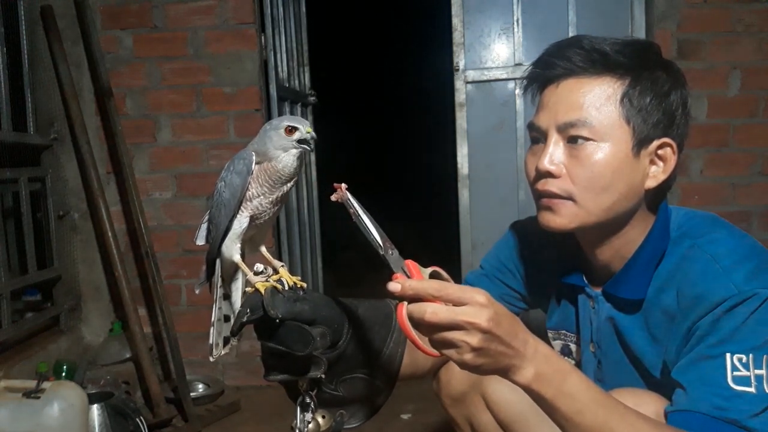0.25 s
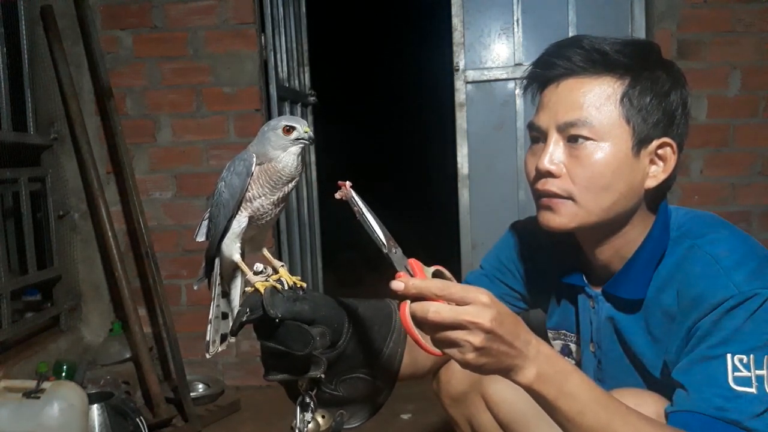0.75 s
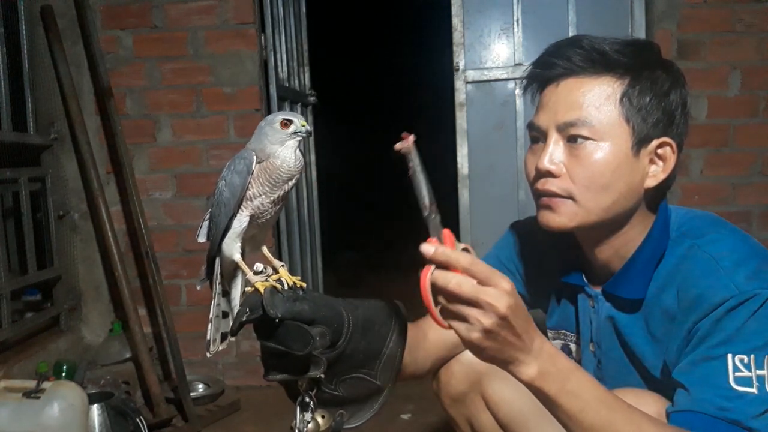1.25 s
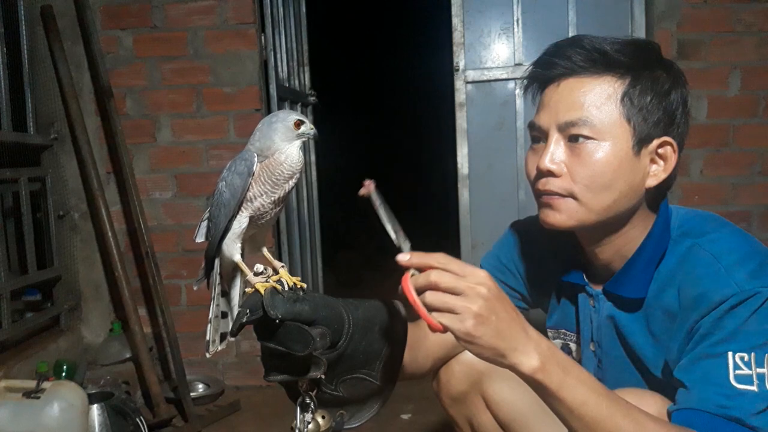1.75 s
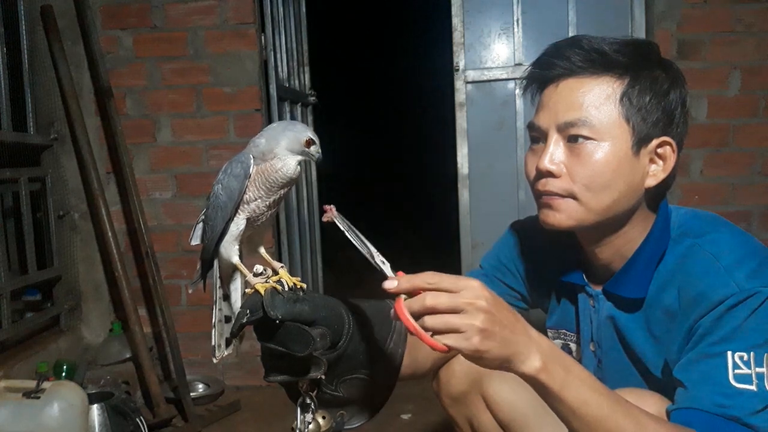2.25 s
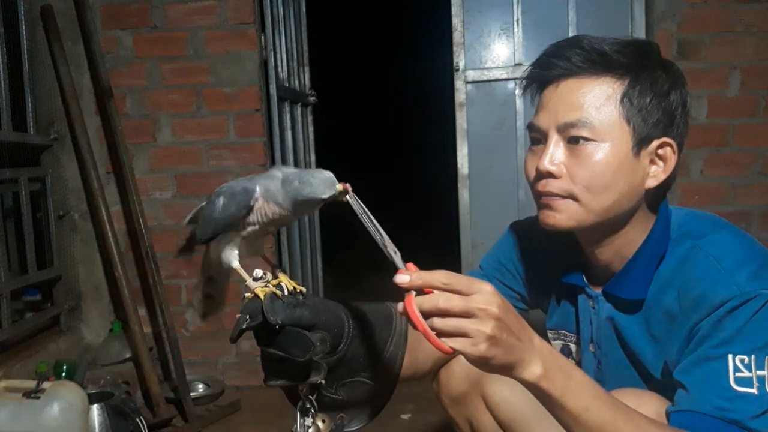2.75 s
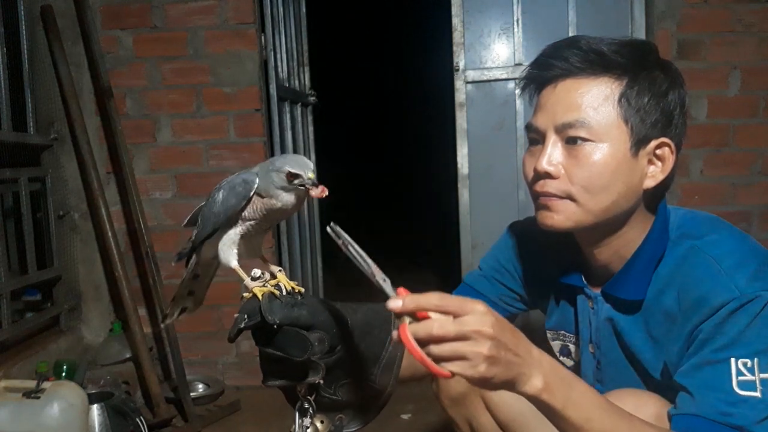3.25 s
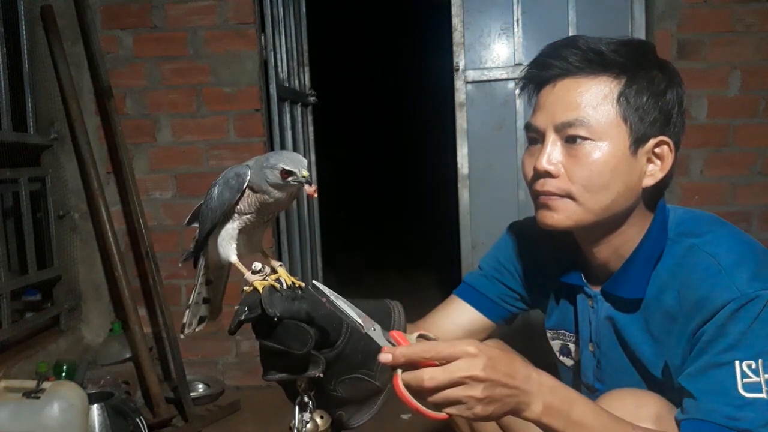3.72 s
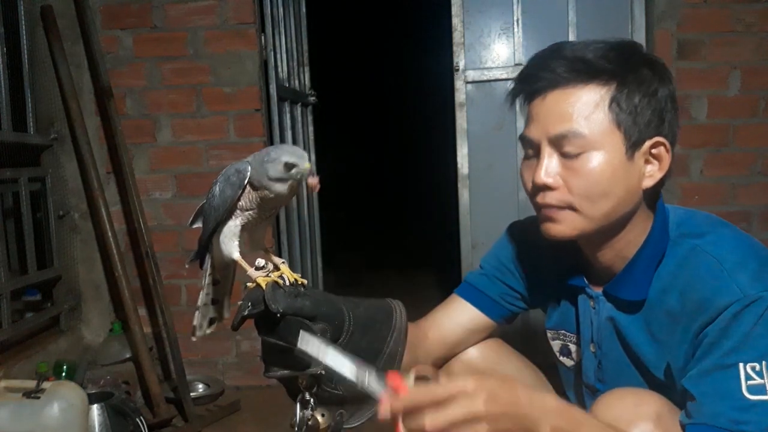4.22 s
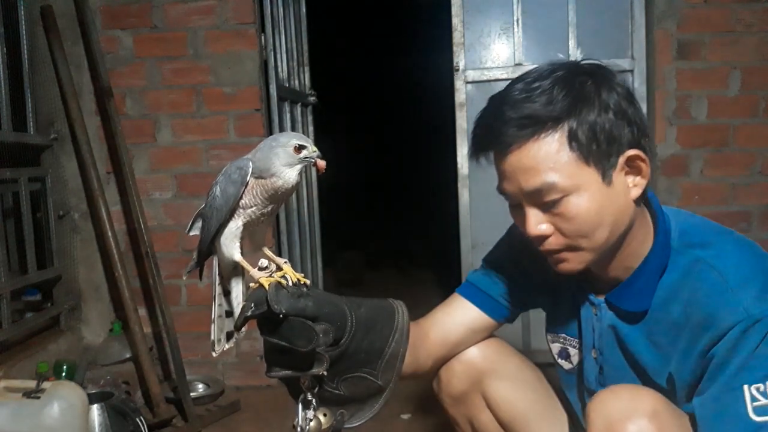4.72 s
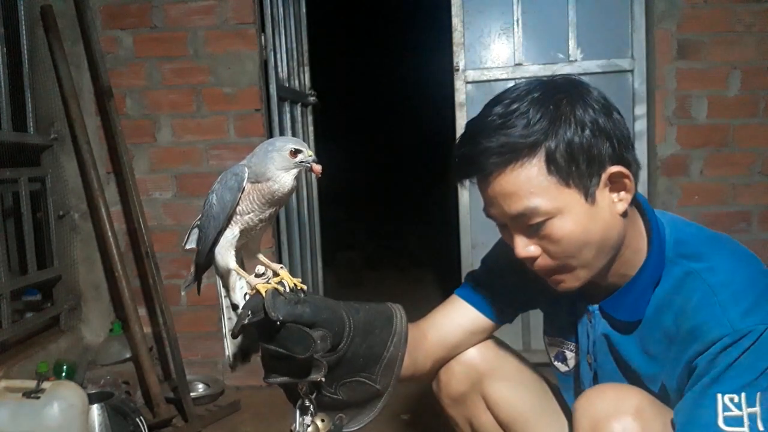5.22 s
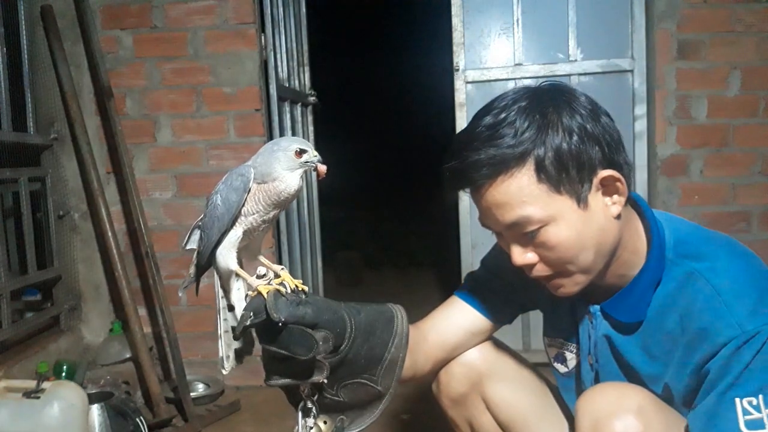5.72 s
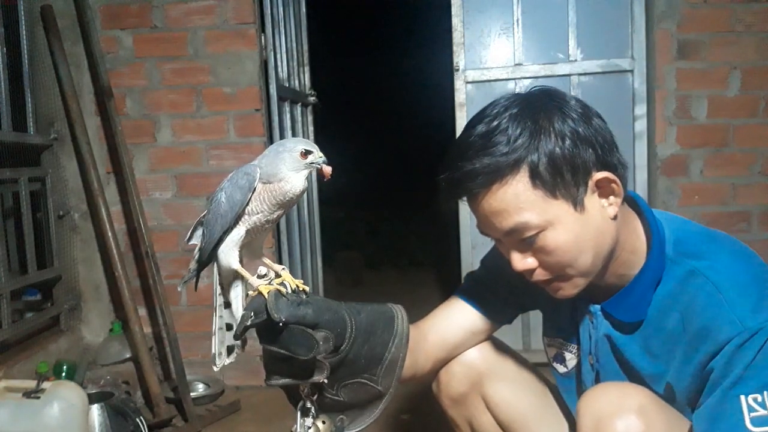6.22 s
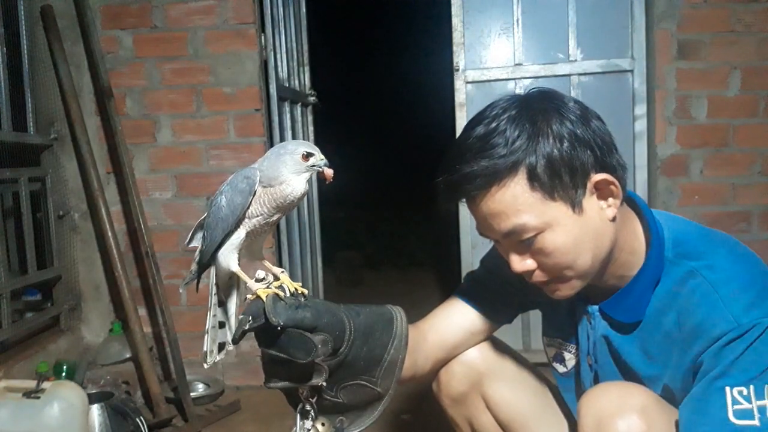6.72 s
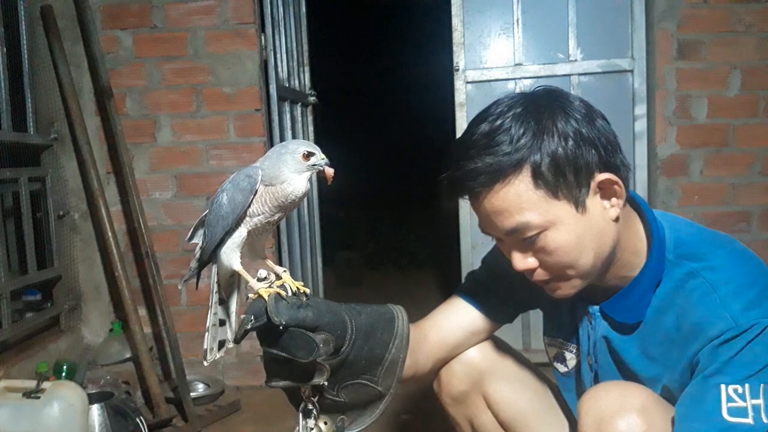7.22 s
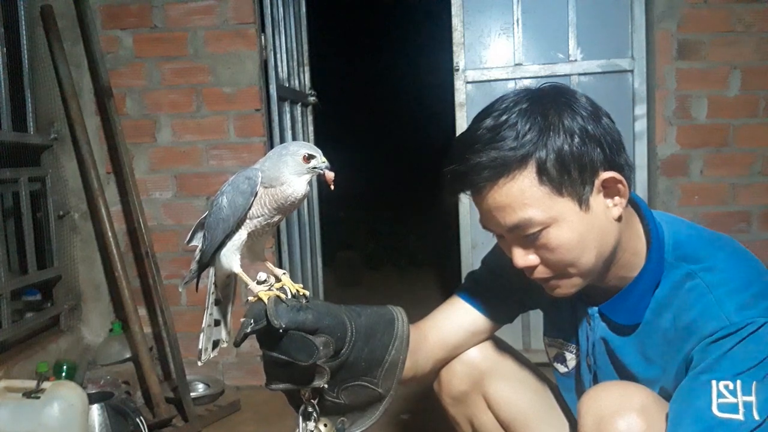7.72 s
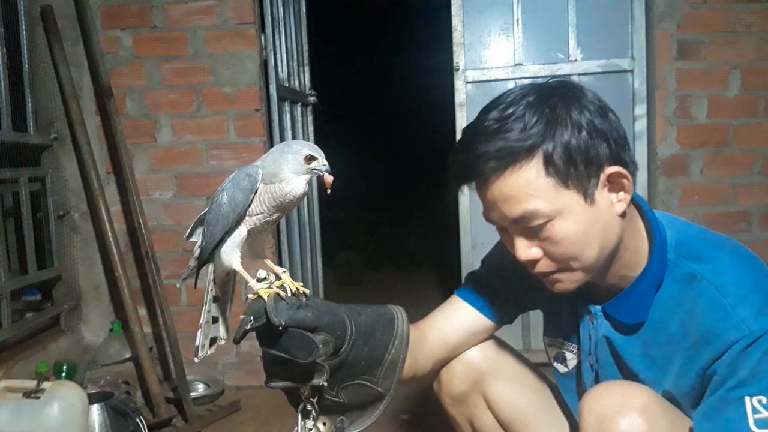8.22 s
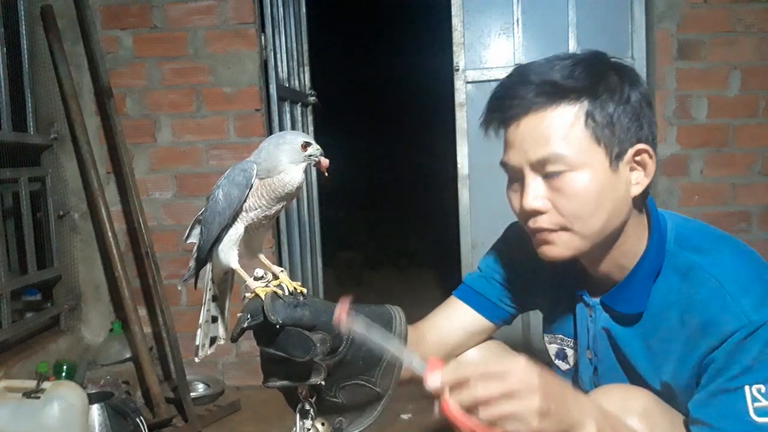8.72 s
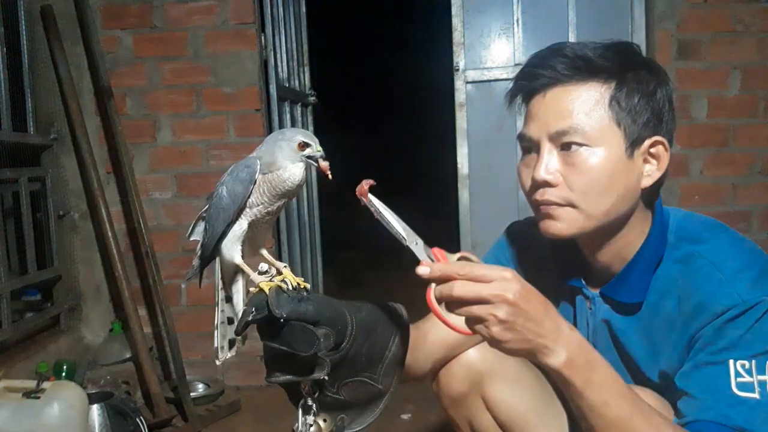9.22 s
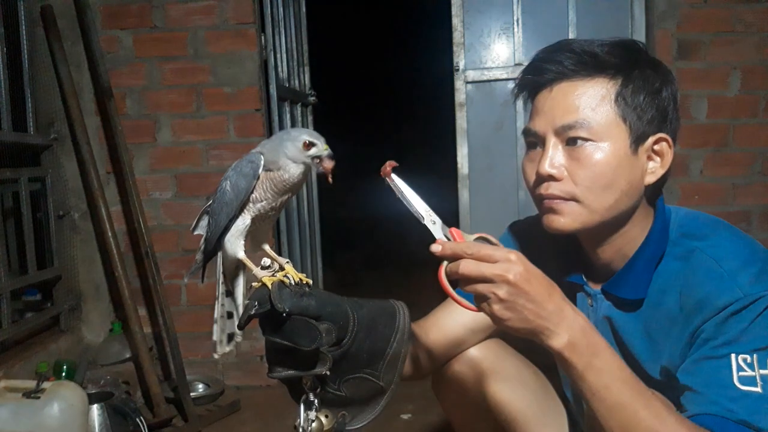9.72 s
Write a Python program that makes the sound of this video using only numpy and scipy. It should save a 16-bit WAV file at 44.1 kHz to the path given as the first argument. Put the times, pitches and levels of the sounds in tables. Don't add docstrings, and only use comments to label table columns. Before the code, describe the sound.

Night beside a brick shed: crowds of insects chirr continuously in the distance over faint rumble and hiss. Close by, a hawk's feathers and a leather glove rustle, with dry beak and talon ticks. A small chain jingles around 3.5 seconds, a dry scissor-like joint squeaks twice just after 4, then a tool knocks a board into ringing between 5.3 and 7.3. The chain jingles again after 8. Near microphone, short echo from bare walls.

```python
import sys
import numpy as np
from scipy import signal
from scipy.fft import rfft, irfft
from scipy.io import wavfile

SR = 44100
rng = np.random.default_rng(int(sys.argv[2]) if len(sys.argv) > 2 else 0)


def voltage_ratio(level):
    return 10 ** (np.asarray(level, float) / 20)


def wav_out(sig):
    wavfile.write(sys.argv[1], SR, np.round(np.clip(np.atleast_2d(sig).T, -1, 1) * 32767).astype(np.int16))


N = 439236


def in_time(rows):
    s, *columns = np.transpose(rows)
    return [np.interp(np.arange(N) / SR, s, c) for c in columns]


def at_hz(points, hz):
    points_hz, values = np.transpose(points)
    return np.interp(np.log(hz + 1), np.log(points_hz), values)


def rms_one(x):
    return x / np.sqrt(np.mean(x ** 2) + 1e-20)


def coloured(x, points):
    hz = np.fft.rfftfreq(x.shape[-1], 1 / SR)
    return rms_one(irfft(rfft(x) * voltage_ratio(at_hz(points, hz)), x.shape[-1]))


def drift(rate_hz, size):
    r = np.exp(-2 * np.pi * rate_hz / SR)
    return rms_one(signal.lfilter([1], [1, -2 * r, r * r], rng.standard_normal(size + 9000))[9000:])


def ring(clicks, hz, t60):
    r, w = voltage_ratio(-60 / (t60 * SR)), 2 * np.pi * hz / SR
    return signal.lfilter([0, np.sin(w)], [1, -2 * r * np.cos(w), r * r], clicks + 1e-18)


def band_pass(x, order, edges_hz):
    return signal.sosfilt(signal.butter(order, edges_hz, "band", fs=SR, output="sos"), x)


def add(out, s, sound):
    i = round(s * SR)
    out[i:i + len(sound)] += sound[:N - i]


# (frequency [Hz], level [dB])
AIR_SPECTRUM = [(30, -22), (100, 0), (170, -6.5), (300, -14.5), (1200, -21.5), (7000, -28.5), (10000, -25),
                (15500, -27)]
# (frequency [Hz], side minus mid [dB])
AIR_SIDE_SPECTRUM = [(30, -24), (100, -37.5), (500, -26.5), (2000, -32), (6000, -21), (15000, -16.5)]


def night_air():
    mid, side = rng.standard_normal((2, N))
    side = voltage_ratio(-4.5) * coloured(side, AIR_SIDE_SPECTRUM)
    return voltage_ratio(-70.5) * coloured(mid + side * [[1], [-1]], AIR_SPECTRUM)


def crowd(song, level_db, strokes_per_s, depth, ring_s, throb_per_s, throb_db, count):
    out, t = np.zeros(N), np.arange(N) / SR
    for hz in np.geomspace(song[1][0], song[-2][0], count):
        pace, start = rng.uniform(0.6, 1.5), rng.random(2)
        strokes = strokes_per_s * pace * t + 0.14 * drift(10.0, N)
        scrape = 1 + np.clip(depth, 0, 1) * np.cos(2 * np.pi * (strokes + start[0]))
        throb = voltage_ratio(throb_db * np.sin(2 * np.pi * (throb_per_s * t + 0.23 * start[1])))
        voice = ring(scrape * throb * rng.standard_normal(N), hz, ring_s)
        out += rms_one(voice) * np.sqrt(hz)
    skirts = [(song[0][0] * 0.21, -60)] + song + [(song[-1][0] * 1.3, -60)]
    return voltage_ratio(level_db) * coloured(out, skirts)


def swells(rows, width_s, rise):
    t = np.arange(0, N, 64) / SR
    bells = [db * np.exp(-0.5 * ((t - s) / width_s / np.where(t < s, rise, 1)) ** 2) for s, db in rows]
    return np.interp(np.arange(N) / SR, t, np.max(bells, axis=0))


# (frequency [Hz], level per Hz [dB])
LOW_SONG = [(2880, -20), (3020, -8.5), (3250, -2), (3430, 3), (3600, -4.5), (3780, -10.5), (3900, -23)]
HIGH_SONG = [(3780, -16.5), (4050, -6), (4250, 0), (4550, 3), (4900, 0.5), (4990, 0), (5060, -30),
             (5300, -22)]
THIN_SONG = [(4900, -12), (5200, 1.5), (5700, -4.5), (6200, -7), (6500, -8)]
SHRILL_SONG = [(6000, -5), (6500, -6.5), (7400, -8), (8300, 0), (8900, -8), (9300, 3)]
# (peak time [s], level over its rest [dB])
LOW_SWELLS = [(.15, 5), (.85, 4), (1.3, 7), (1.95, 3.5), (2.6, 6.5), (3.3, 3.5), (3.9, 7.5), (4.35, 3.5),
              (5.2, 6.5), (5.8, 2.5), (6.55, 7), (7.2, 3), (7.75, 6.5), (8.35, 3.5), (9.15, 3), (9.78, 5.5)]
# (rate [1/s], one peak [s], depth [dB])
THROBS = [(4.445, 5.089, 1.07), (4.54, 4.952, 0.9)]
# (peak time [s], level over rest [dB])
PHRASES = [(.05, 13.5), (.57, 8.5), (.9, 11), (1.3, 16.5), (1.85, 10.5), (2.42, 11), (2.75, 13.5),
           (3.3, 13), (3.6, 15), (4.2, 15), (4.55, 4), (4.95, 15.5), (5.2, 11), (5.68, 9.5), (5.87, 14.5),
           (6.45, 1), (7.62, 10.5), (7.98, 10), (8.2, 11.5), (8.5, 18.5), (9.0, 4), (9.18, 13), (9.52, 13),
           (9.72, 7), (9.95, 3)]


def chorus():
    t = np.arange(N) / SR
    phrases_db = swells(PHRASES, width_s=0.13, rise=0.68)
    low_db = -69 + swells(LOW_SWELLS, width_s=0.22, rise=1.0)
    high_db = -57.5 - 2 * np.exp(-(t / 1.5) ** 2)
    high_db = high_db + sum(db * np.cos(2 * np.pi * pace * (t - s)) for pace, s, db in THROBS)
    out = crowd(LOW_SONG, low_db, strokes_per_s=88, depth=0.3, ring_s=0.0037,
                throb_per_s=3.0, throb_db=0.35, count=7)
    out += crowd(HIGH_SONG, high_db, strokes_per_s=98, depth=0.2, ring_s=0.0052,
                 throb_per_s=2.9, throb_db=1.3, count=8)
    out += crowd(THIN_SONG, -79 + 0.61 * phrases_db, strokes_per_s=65, depth=0.47, ring_s=0.0055,
                 throb_per_s=1.4, throb_db=-4.5, count=4)
    out += crowd(SHRILL_SONG, -84 + phrases_db, strokes_per_s=290, depth=0.23, ring_s=0.0019,
                 throb_per_s=2.5, throb_db=-0.2, count=6)
    return out


# (time [s], length [s], level [dB],
# width # [octaves])
BURSTS = [(0.144, 0.009, -54, 0.57), (0.496, 0.16, -68, 0.58), (1.172, 0.2, -65, 1.5),
          (1.35, 0.15, -62.5, 1.3), (2.353, 0.12, -61.5, 0.88), (3.687, 0.064, -55.5, 1.3),
          (3.97, 0.1, -55.5, 0.62), (4.25, 0.36, -69, 0.53), (4.846, 0.33, -69.5, .8),
          (7.596, 0.057, -62, 0.86), (7.943, 0.2, -68, 1), (8.126, .13, -67, 0.9),
          (8.461, 0.08, -58.5, 2.2), (8.535, 0.15, -59.5, 0.88), (8.955, 0.14, -64.5, 1),
          (9.459, 0.14, -64.5, .6)]
# (time [s], length [s], level [dB],
# centre [Hz])
SWISHES = [(2.138, 0.45, -73.5, 15200), (2.38, 0.09, -65, 12500), (3.181, 0.15, -58, 11200),
           (4.067, 0.13, -58, 14000), (4.203, 0.37, -69, 12500), (4.914, 0.11, -60, 13400),
           (5.805, 0.096, -58.5, 14000), (6.64, .079, -63, 12900), (7.568, 0.11, -58.5, 13900),
           (8.68, .052, -68.5, 12000), (9.138, .12, -72, 11500), (9.472, .11, -74, 11700),
           (5.59, 0.086, -73, 12000)]
# (time [s], length [s], level [dB], centre [Hz], width [octaves])
CREAKS = [(0.654, .05, -70, 970, 0.78), (1.18, 0.041, -75.5, 544, .46), (1.297, 0.34, -67, 197, 0.65),
          (1.285, 0.2, -70.5, 1100, 1.6), (1.353, .45, -64.5, 85, 1.24), (1.375, 0.048, -55, 1110, 1.3),
          (2.38, 0.205, -70.5, 195, 0.55), (2.397, .06, -71, 2530, 1), (2.842, 0.029, -71, 860, 0.96),
          (3.103, 0.0062, -45.5, 3800, 0.21), (3.199, 0.24, -78.5, 1500, 1.5),
          (3.45, 0.048, -64, 2480, 0.65), (3.731, 0.039, -58, 1640, 0.39), (3.99, 0.15, -53.5, 6100, 0.35),
          (4.445, 0.06, -57, 3600, 0.76), (4.488, .11, -73, 468, 0.29), (4.95, 0.11, -73, 1040, .59),
          (5.335, .03, -55, 1460, 0.2), (8.202, 0.041, -69.5, 1930, .7), (8.323, 0.039, -62, 1620, 0.22),
          (8.341, .17, -62, 2520, 1.7)]


def rustles():
    bursts = [(s, length, db, 8140, octaves) for s, length, db, octaves in BURSTS]
    swishes = [(s, length, db, hz, 0.83) for s, length, db, hz in SWISHES]
    out = np.zeros(N)
    for s, length, level_db, hz, octaves in bursts + swishes + list(CREAKS):
        u = np.arange(round(max(length, 0.005) * SR)) / (length * SR)
        unevenness = voltage_ratio(2.4 * drift(75.7, SR // 2)[:len(u)])
        grains = rng.standard_normal(SR // 2)[:len(u)] * unevenness
        edges = np.clip([hz * 2 ** (-octaves / 2), hz * 2 ** (octaves / 2)], 20, 0.45 * SR)
        swell = np.sin(np.pi * np.clip(u, 0, 1) ** 0.36)
        add(out, s, voltage_ratio(level_db) * rms_one(band_pass(grains, 2, edges)) * swell)
    return out


# (time [s], peak level [dB], centre [Hz])
TICKS = [(.148, -48, 8000), (2.758, -46, 5970), (2.758, -61, 1500), (3.108, -50, 8000), (5.588, -56, 13000),
         (7.589, -38, 13500), (9.244, -57, 2280), (9.243, -48, 7000), (9.656, -42, 8300),
         (9.656, -44, 12700), (9.95, -51, 8200)]


def ticks():
    out = np.zeros(N)
    for s, peak_db, hz in TICKS:
        add(out, s, voltage_ratio(peak_db - 0.5) * ring(np.arange(200) == 0, hz, 9.9 / hz))
    return out


# (time [s], peak level [dB])
JINGLES = [(3.4944, -55), (3.5294, -57), (3.674, -50), (3.697, -44), (8.1888, -54), (8.2294, -59),
           (8.271, -52), (8.299, -58), (8.531, -47.5), (8.569, -45), (8.6073, -51), (8.672, -49)]
# (frequency [Hz], level [dB], t60 [s])
CHAIN_MODES = [(13860, -13, .12), (13930, -8, .2), (13990, -14, .12), (14300, -28, .04), (10950, -21, .12),
               (9350, -24, .04), (8540, -26, .05)]


def chain():
    rubbing = np.zeros(N)
    for s, peak_db in JINGLES:
        u = np.arange(SR // 10) / (0.038 * SR)
        envelope = u * np.exp(-4 * u) * np.e * 4
        add(rubbing, s - 0.004, voltage_ratio(peak_db - 31.5) * envelope * rng.standard_normal(len(u)))
    return sum(voltage_ratio(db) * ring(rubbing, hz, t60) for hz, db, t60 in CHAIN_MODES)


# (time [s], thud [dB], board [dB], bite [dB], steel [dB])
KNOCKS = [(5.338, -68.5, -56, -43.5, -51), (5.347, -68.5, -61, -56, -52), (6.030, -68, -28.5, -28, -35),
          (6.040, -41.5, -30, -51, -35.5), (6.059, -51, -30.5, -40.5, -52), (6.086, -41.5, -35, -67, -60),
          (6.617, -70, -37.5, -40.5, -48), (6.631, -52.5, -39, -39.5, -44), (6.658, -55, -46, -60, -62),
          (6.698, -74, -60, -64, -55), (6.938, -73, -46, -54, -77), (6.964, -63.5, -57, -61, -76),
          (7.293, -63, -48.5, -45, -57), (7.304, -79, -43, -66, -68)]
# (frequency [Hz], level [dB], t60 [s])
BOARD_MODES = [(782, -3, 0.39), (830, 10.5, 0.3), (1051, 16.5, 0.29), (1143, -7, 0.28), (1200, -8, 0.25),
               (1267, 1, 0.22), (1325, 3.5, 0.26), (1423, 0, 0.19), (1518, 8.5, .4), (1865, -11, 0.19)]
# (frequency [Hz], level per Hz [dB])
CRACK_SPECTRUM = [(110, -46), (175, 10.5), (700, -21), (1100, 1), (2000, 1.5), (2500, -8), (3300, 3.5),
                  (15500, -1.5)]


def knocks():
    cracks, rings, t = np.zeros(N), np.zeros(N), np.arange(SR // 2) / SR
    bands = [(150, 900), (900, 1600), (1600, 3000), (3000, 9000), (9000, 17000)]
    for s, thud_db, board_db, bite_db, steel_db in KNOCKS:
        crack = coloured(rng.standard_normal(len(t)), CRACK_SPECTRUM) * np.exp(-t / 0.0045)
        edge_db = 3.5 + (board_db + bite_db) / 2
        for db, edges in zip([thud_db, board_db, edge_db, bite_db, steel_db], bands):
            add(cracks, s, voltage_ratio(db + 11.5) * band_pass(crack, 3, edges))
        for hz, db, t60 in BOARD_MODES:
            light = hz > 1100 and not 1470 < hz < 1600
            push_db = board_db if light else thud_db
            own_db = rng.normal(0, 2)
            add(rings, s, voltage_ratio(push_db + db + own_db - 13.5) * ring(t == 0, hz, t60))
    high_pass = signal.butter(4, 140, "high", fs=SR, output="sos")
    return signal.sosfilt(high_pass, [cracks, rings])


# (multiple of the pitch, level against the octave [dB])
OVERTONES = [(3, -15), (4, -10), (4.5, -28), (5, -28)]


def slip(hz, level_db, rough, octave_db):
    rough = np.clip(rough, 0, 1)
    phase = 2 * np.pi * np.cumsum(hz * (1 + 0.0645 * rough * drift(145, len(hz)))) / SR
    high = sum(voltage_ratio(db - 60 * rough) * np.sin(k * phase) for k, db in OVERTONES)
    tone = np.sin(phase) + voltage_ratio(octave_db) * (np.sin(2 * phase) + high)
    return voltage_ratio(level_db + 2.9 * np.sqrt(rough) * drift(53, len(hz))) * tone, phase


# (time [s], pitch [Hz], level [dB], octave against it [dB])
FIRST_SQUEAL = [(3.99, 2280, -65, -2), (4.005, 2290, -46, 8), (4.05, 2149, -37, -1), (4.1, 2151, -40, 0.5),
                (4.124, 2280, -33.5, 0.5), (4.14, 2405, -44, -13)]
SECOND_SQUEAL = [(4.13, 2980, -79, -4), (4.145, 2896, -39.5, -10), (4.25, 2848, -36, -2.5),
                 (4.293, 2850, -43.5, -3), (4.313, 2831, -22.5, -19.5), (4.337, 2790, -43, -4),
                 (4.38, 2725, -38, -10.5), (4.418, 2670, -39.5, -19), (4.46, 2606, -47, -9)]
# (from [s], to [s], level [dB])
HALF_LINE = (4.22, 4.39, -54)
# (time [s], length [s], level [dB], from pitch [Hz], to pitch [Hz])
SLIDES = [
    (3.731, 0.022, -60, 2044, 1345),
    (3.97, 0.047, -47, 9100, 5160),
    (4.428, .085, -44, 2202, 1595),
]


def squeal():
    out = np.zeros(N)
    for rows, rough, rough_per_khz_sag in [(FIRST_SQUEAL, 0.24, 0), (SECOND_SQUEAL, 0.042, 0.97)]:
        start, end = rows[0][0], rows[-1][0]
        hz, level_db, octave_db = [c[round(start * SR):round(end * SR)] for c in in_time(rows)]
        sag_khz = np.maximum(2790 - hz, 0) / 1e3
        sound, phase = slip(hz, level_db, rough + rough_per_khz_sag * sag_khz, octave_db)
        add(out, start, sound)
    half_from, half_to, half_db = HALF_LINE
    u = np.clip((start + np.arange(len(phase)) / SR - half_from) / (half_to - half_from), 0, 1)
    add(out, start, voltage_ratio(half_db) * np.sin(np.pi * u) * np.sin(phase / 2))
    for s, length, db, from_hz, to_hz in SLIDES:
        u = np.minimum(np.arange(SR // 8) / SR / length, 3)
        rise_db = 20 * np.log10(np.clip(u / 0.12, 1e-3, 1))
        hz = to_hz + (from_hz - to_hz) * np.exp(-2.5 * u)
        sound, _ = slip(hz, db + rise_db - 16 * u ** 2, rough=0.745, octave_db=-19)
        add(out, s, sound)
    return out


# (frequency [Hz], t60 [s])
WALL_DECAY = [(150, 0.31), (1000, 0.34), (4000, 0.38), (10000, 0.31), (15000, 0.29)]


def walls(x):
    t, tail = np.arange(SR * 3 // 4) / SR, 0
    for hz in 125 * 2.0 ** np.arange(8):
        edges = [hz / np.sqrt(2), min(hz * np.sqrt(2), 0.45 * SR)]
        noise = band_pass(rng.standard_normal((2, len(t))), 2, edges)
        tail = tail + noise * voltage_ratio(-60 * t / at_hz(WALL_DECAY, hz))
    tail = tail * np.clip(t / 0.0024, 0, 1) / np.sqrt(np.sum(tail[0] ** 2))
    mid, side = voltage_ratio(5.5) * signal.fftconvolve(x[None], tail, axes=1)[:, :N]
    return mid + voltage_ratio(-54) * side * [[1], [-1]]


def scene():
    far = night_air() + chorus()
    cracks, rings = knocks()
    near = voltage_ratio(-5.0) * (cracks + rustles())
    nearest = voltage_ratio(2.5) * (ticks() + chain()) + rings
    joint = voltage_ratio(-1.5) * squeal()
    echo = walls(near + voltage_ratio(-5.5) * joint + voltage_ratio(-11) * nearest)
    return far + near + joint + nearest + echo


def band_limit(x):
    return signal.sosfilt(signal.butter(12, 16660, fs=SR, output="sos"), x)


# (frequency [Hz], level [dB])
MICROPHONE = [(40, 2.5), (120, 0), (8800, 2.5), (9300, -8), (10300, -5.5), (11500, -0.5), (13500, 2),
              (15500, 3.5)]


def record(dry):
    hz = np.fft.rfftfreq(N, 1 / SR)
    heard = irfft(rfft(dry) * voltage_ratio(at_hz(MICROPHONE, hz)), N)
    top_cut = signal.cheby2(14, 45, 15790 * 1.02, fs=SR, output="sos")
    return band_limit(signal.sosfilt(top_cut, heard))


dry = scene()
out = record(dry)
wav_out(out)
```